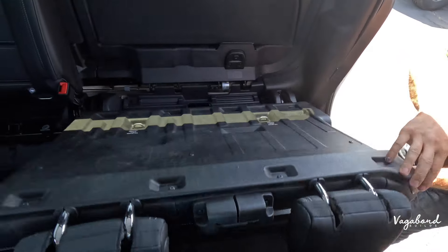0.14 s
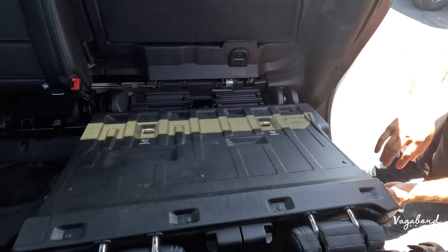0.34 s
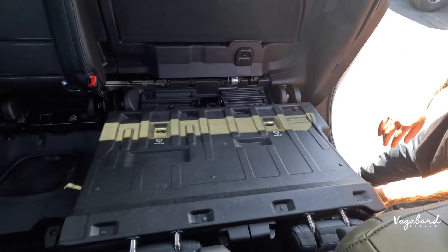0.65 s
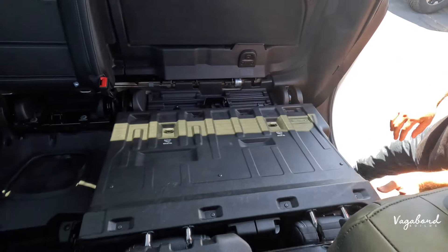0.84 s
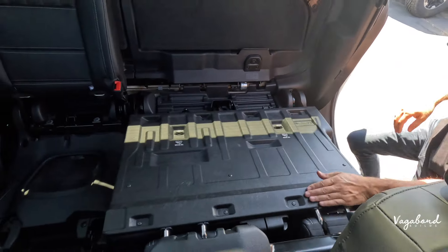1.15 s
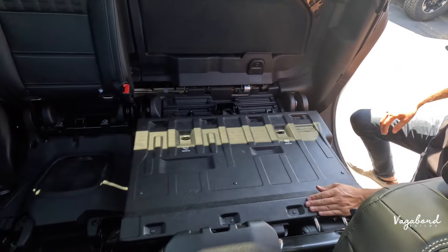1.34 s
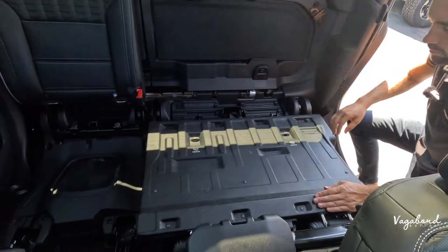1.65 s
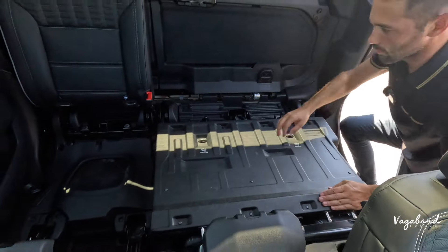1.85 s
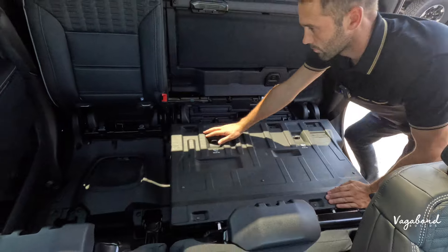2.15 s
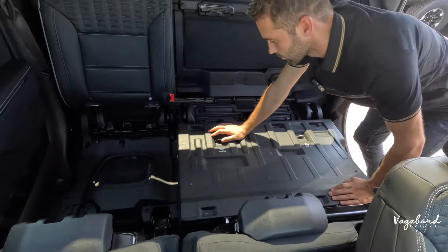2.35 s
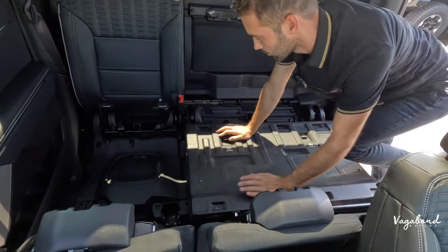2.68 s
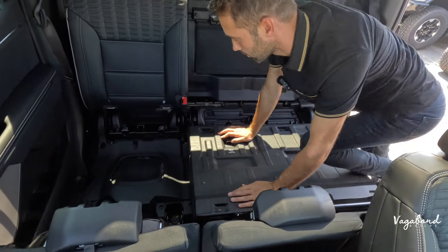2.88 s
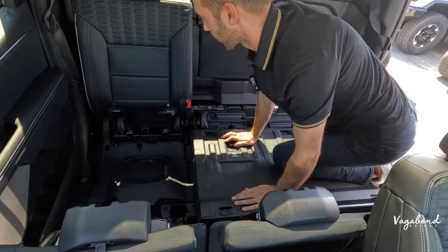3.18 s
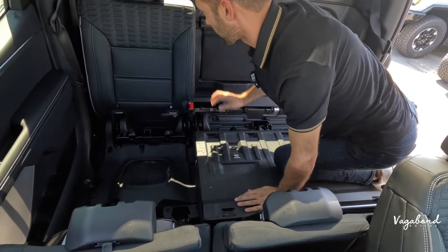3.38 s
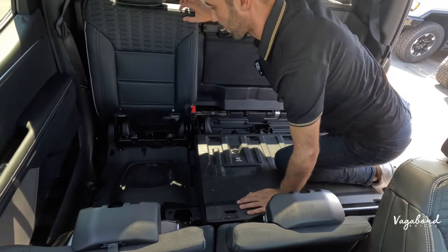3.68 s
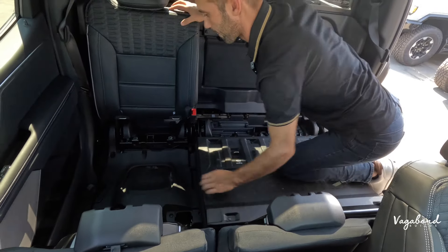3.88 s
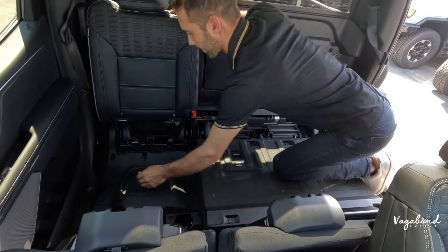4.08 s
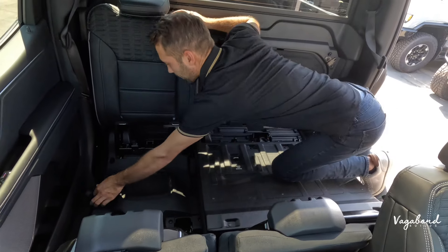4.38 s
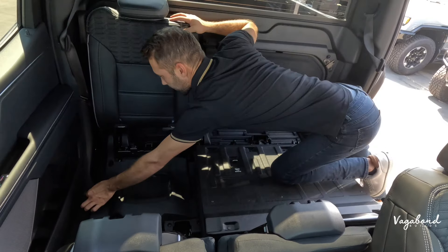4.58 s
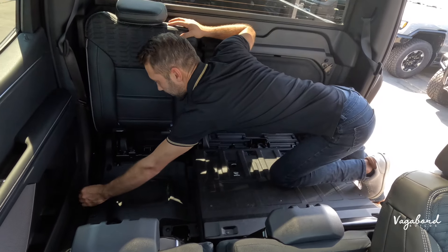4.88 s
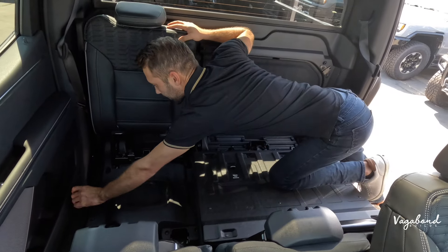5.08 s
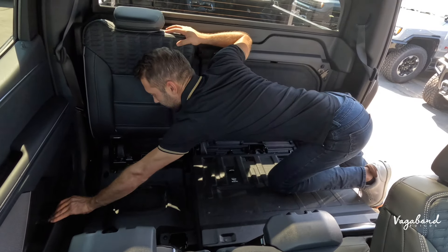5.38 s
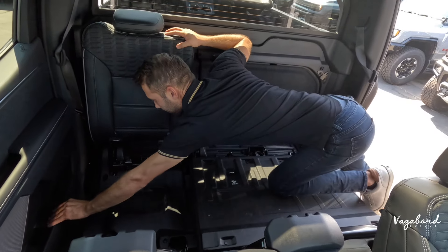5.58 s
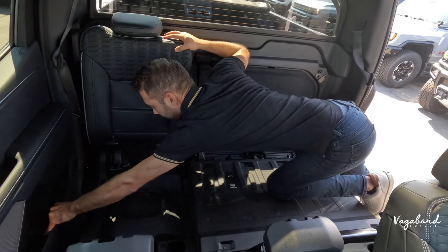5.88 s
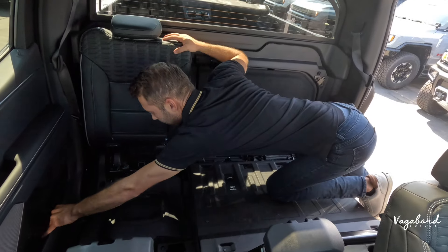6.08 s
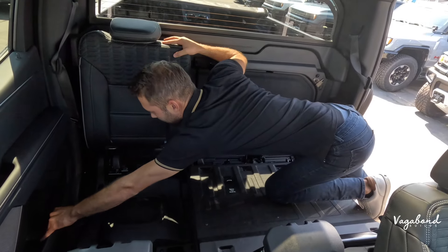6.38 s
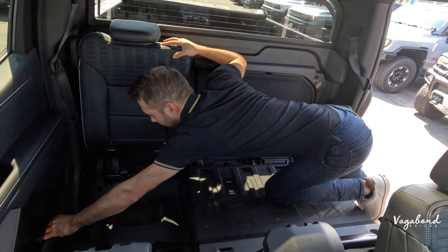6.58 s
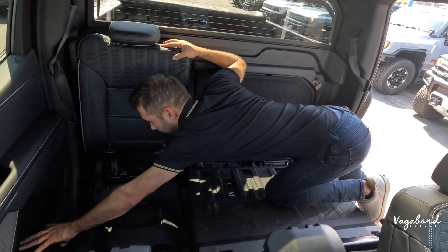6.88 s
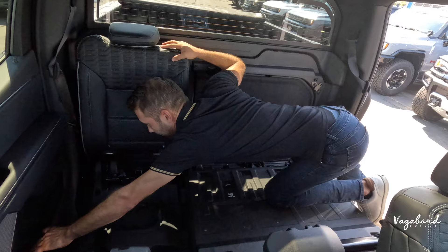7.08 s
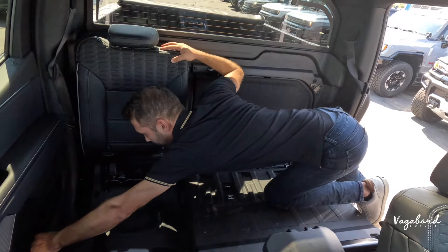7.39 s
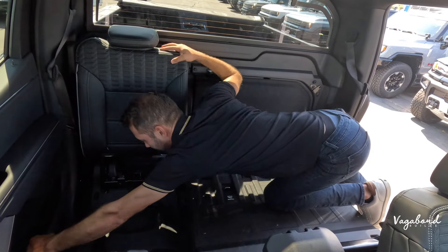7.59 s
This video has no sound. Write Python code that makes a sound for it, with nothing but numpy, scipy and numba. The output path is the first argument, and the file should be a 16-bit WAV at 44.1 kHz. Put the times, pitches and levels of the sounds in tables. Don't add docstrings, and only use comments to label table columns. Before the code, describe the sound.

Close-up handling of a folded rear seat: dull, damped plastic thuds with small latch clicks, gritty fabric rubs and low creaking under shifting weight. Sparse and uneven for the first four seconds, almost still around five, then crowded with knocking, snapping and rattling, peaking in two heavy clunks near seven. Nearly mono, dry small cabin, with a quiet yard and faint machine hum behind.

```python
import sys
import numpy as np
from scipy import signal
from scipy.io import wavfile
from scipy.ndimage import uniform_filter1d
from numba import njit

SR = 44100
rng = np.random.default_rng(int(sys.argv[2]) if len(sys.argv) > 2 else 0)


def nominal_scale(level):
    x = np.asarray(level, float) / 20
    return 10 ** x


def int16_out(signal):
    q = np.round(np.clip(np.atleast_2d(signal).T, -1, 1) * 32767)
    wavfile.write(sys.argv[1], SR, q.astype(np.int16))


N = 341334


def level(x, db):
    return x * nominal_scale(db) / np.sqrt(np.mean(x ** 2))


def crest(x, db):
    return x * nominal_scale(db) / np.max(np.abs(x))


@njit
def svf(x, hz, q):
    y, b, l = np.empty(len(x)), 0., 0.
    for i in range(len(x)):
        g = np.tan(np.pi * hz[i] / SR)
        v = (b + g * (x[i] - l)) / (1 + g * (g + 1 / q))
        b, l, y[i] = 2 * v - b, l + 2 * g * v, v / q
    return y


def band(x, hz, q, order=2):
    hz = np.clip(hz * np.ones(len(x)), 20, .44 * SR)
    for _ in range(order):
        x = svf(x, hz, 1. * q)
    return x


def walk(rate_hz, size=N):
    k = int(SR / rate_hz)
    held = np.repeat(rng.standard_normal(size // k + 1), k)
    return 1.81 * uniform_filter1d(uniform_filter1d(held, k), k)[:size]


def grit(rate_hz, spread_db, size=N):
    k = max(int(SR / rate_hz), 1)
    jump_db = spread_db * np.minimum(rng.exponential(size=size), 3.5)
    return rng.standard_normal(size) * np.repeat(nominal_scale(jump_db), k)[:size]


def swell(t, rise_s, t60_s):
    rise_s, t60_s = np.clip(rise_s, .0004, .04), np.clip(t60_s, .012, .3)
    return np.minimum(t / rise_s, 1) * np.exp(-np.log(1000) * np.maximum(t - rise_s, 0) / t60_s)


def add(out, s, x):
    i = max(int(s * SR), 0)
    out[i:i + len(x)] += x[:N - i]


def yard():
    # (frequency [Hz], density [dB per Hz])
    wash_curve = [(30, 16), (70, -4.5), (200, -14), (400, -11), (800, -5.5), (1200, -33), (3000, -19),
                  (7000, -35.5), (11000, -66.5), (15000, -52)]
    # (centre [Hz], width [Hz], level [dB])
    hum_bands = [(296, 4.7, -62), (780, 9.2, -66.5)]
    hz_at, db_at = np.transpose(wash_curve)
    wash = np.zeros(N)
    for hz in 36 * 2 ** np.arange(0, 8.8, .5):
        db = np.interp(np.log(hz), np.log(hz_at), db_at) + 10 * np.log10(hz) + 1.7 * walk(1.1)
        wash += nominal_scale(db) * level(band(rng.standard_normal(N), hz, 0.98), 0)
    hum = np.zeros(N)
    for hz, width_hz, db in hum_bands:
        hum += level(band(rng.standard_normal(N), hz, hz / width_hz, order=1), db)
    lull_s, lull_width_s, lull_db = 5.1, 0.27, -4
    fade_db = lull_db * np.exp(-((np.arange(N) / SR - lull_s) / lull_width_s) ** 4)
    return (level(wash, -57) + hum) * nominal_scale(fade_db)


def load():
    # (time [s], weight on the panels [dB], movement of the clothes [dB])
    effort = [(0, -62.5, -47.5), (.34, -48.5, -55), (.8, -58.5, -58), (1.08, -55.5, -63.5),
              (1.33, -38, -61), (1.58, -51.5, -67.5), (2.05, -46, -60), (2.7, -61.5, -60.5),
              (2.95, -47, -60), (3.53, -61.5, -66), (3.75, -50, -56), (4.14, -49, -61), (5.3, -66, -85),
              (5.7, -40, -67), (6.05, -54.5, -69), (6.32, -49.5, -68), (6.8, -49, -69), (7.74, -45.5, -58)]
    # (centre [Hz], width [Hz], level [dB])
    resonances = [(114, 86, -2.5), (257, 100, 1), (300, 48, 1.5), (413, 12, 2), (560, 75, -0.5),
                  (793, 94, -1.5)]
    at_s, weight_db, cloth_db = np.transpose(effort)
    t = np.arange(N) / SR
    rumble_db, rustle_db = np.interp(t, at_s, weight_db), np.interp(t, at_s, cloth_db)
    creak_db = rumble_db - 8

    slips = grit(110, 1.6)
    panel = np.zeros(N)
    for k, (hz, width_hz, db) in enumerate(resonances):
        panel += (-1) ** k * nominal_scale(db) * band(slips, hz, hz / width_hz, order=1)
    rumble = level(band(panel, 300., .4), 0) * nominal_scale(rumble_db + 1.8 * walk(25))

    creak = band(grit(300, 2.8), 1500 * 2 ** (0.28 * walk(4.2)), 1.3)
    creak = level(creak, 0) * nominal_scale(creak_db + 0.36 * walk(5.7))

    rustle = np.zeros(N)
    for hz in (3200., 4600., 6500., 9000., 12500.):
        cloth = band(grit(400, 4.), hz, 2.)
        rustle += level(cloth, -10 - 9 * (hz > 1e4)) * nominal_scale(3.5 * walk(22))
    return rumble + creak + rustle * nominal_scale(rustle_db)


def thuds():
    # (time [s], peak [dB])
    pushes = [(2.191, -27), (3.128, -34), (3.31, -54), (4.215, -34), (5.75, -21), (6.879, -21),
              (7.007, -36.5), (7.261, -21), (1.129, -38), (3.758, -34.5), (5.352, -27.5), (5.469, -32.5),
              (5.631, -30.5), (5.84, -43), (6.13, -35), (6.352, -31), (7.572, -46)]
    out, t = np.zeros(N), np.arange(SR // 4) / SR
    for s, db in pushes:
        push = grit(440, 0.83, size=len(t)) * swell(t, rise_s=0.0096, t60_s=0.36)
        add(out, s, crest(band(push, 81.4, 0.67), db))
    return out


def rubs():
    # (time [s], length [s], level [dB], centre [Hz], spread [octaves])
    climbing = [(0, 0.08, -39.5, 7900, 0.28), (0.073, 0.086, -41, 7800, 0.3), (0.16, 0.15, -34, 6160, 0.45),
                (0.339, .11, -35, 5050, 0.36), (0.442, 0.31, -49, 5950, 0.35),
                (0.6, 0.3, -50.5, 6430, 0.48), (0.806, 0.044, -54, 11700, 0.093),
                (1.09, 0.14, -43, 6650, 0.47), (1.212, .17, -46.5, 8500, 0.38), (1.27, 0.14, -35.5, 392, 1),
                (1.462, 0.2, -55, 8100, 0.26), (1.62, 0.19, -37, 394, 0.84), (1.789, .14, -49.5, 6600, 0.3),
                (1.945, 0.14, -45.5, 4050, 0.72), (2.18, 0.071, -33, 3730, 0.84),
                (2.438, 0.15, -26, 6880, 0.51), (2.475, 0.096, -28, 2700, 0.42),
                (2.576, 0.017, -17.5, 5100, 0.87), (2.728, 0.067, -32.5, 6350, 0.82),
                (2.845, 0.072, -36, 6900, 0.5), (2.875, 0.13, -46.5, 2050, 0.6)]
    leaning = [(3.032, 0.075, -47, 2660, 0.32), (3.102, 0.13, -36.5, 3700, 0.6),
               (3.224, 0.15, -54, 5440, 0.3), (3.278, 0.067, -41, 2420, 0.36),
               (3.283, 0.069, -59, 8250, 0.38), (3.548, 0.064, -39.5, 6200, 0.77),
               (3.625, 0.069, -41.5, 6030, 0.42), (3.746, 0.11, -36, 6100, 0.74),
               (3.886, 0.061, -45, 6000, 0.89), (3.951, 0.22, -54, 4520, 0.38),
               (4.018, 0.066, -61, 11960, 0.033), (4.492, 0.1, -56, 4540, 0.55)]
    dragging = [(5.357, 0.14, -53, 4660, 0.37), (5.463, 0.031, -41, 11600, 0.5),
                (5.513, 0.017, -39.5, 8600, 0.64), (5.641, 0.14, -53, 2450, 0.49),
                (5.745, 0.095, -43.5, 4660, 0.81), (6.064, 0.034, -46.5, 2970, 0.63),
                (6.139, 0.062, -45.5, 8400, 0.76), (6.229, .035, -43, 3540, 1.1),
                (6.301, 0.03, -42.5, 2460, 0.87), (6.454, 0.049, -47, 3300, 0.87),
                (6.57, 0.033, -24, 534, 0.18), (6.669, 0.23, -43, 4430, 0.37),
                (6.69, 0.045, -29, 908, 0.22), (6.759, 0.038, -45, 1407, 0.13),
                (6.799, 0.062, -41.5, 1770, 0.61), (6.892, 0.036, -16.5, 1730, 1.065),
                (7.248, 0.052, -37.5, 4000, 0.47), (7.491, 0.073, -48.5, 5700, 0.37),
                (7.617, 0.022, -41.5, 3570, 0.39)]
    brushing = [(1.27, 0.056, -60, 2870, 0.38), (1.3, 0.24, -65, 1420, 0.36),
                (2.86, 0.11, -37.5, 690, 0.93), (3.75, 0.076, -37, 954, 0.62),
                (3.915, 0.061, -44.5, 2270, 0.87), (5.92, 0.12, -63, 3300, 0.54),
                (5.49, 0.087, -50.5, 3300, 0.59), (5.76, 0.12, -51.5, 3730, 0.2),
                (6.13, 0.092, -47, 2620, 0.83), (6.2, 0.08, -56, 4320, 0.3), (4.14, 0.089, -52, 2360, 0.55),
                (6.455, 0.069, -48, 3960, 0.15), (6.465, 0.046, -59, 8100, 0.38),
                (6.94, 0.095, -53.5, 3220, 0.65), (7.06, 0.11, -75, 3180, 0.3),
                (7.19, 0.099, -59, 3750, 0.2), (7.3, 0.039, -52, 3500, 0.84), (7.4, 0.12, -72, 3500, 0.49),
                (7.64, 0.13, -56, 3460, 0.3)]
    kinds = (climbing, -0.091), (leaning, -0.064), (dragging, 0.29), (brushing, -0.029)
    pull_s = 0.071
    out = np.zeros(N)
    strokes = [(*row, glide) for rows, glide in kinds for row in rows]
    for s, length_s, db, hz, spread, glide in strokes:
        u = np.arange(SR // 3) / (SR * np.clip(length_s, .02, .26))
        spread = np.clip(spread, .015, 1.2)
        press = np.minimum(u / 0.27, 1) ** 1.2 * np.exp(-(np.maximum(u - .45, 0) / 0.49) ** 2)
        press_rms = np.sqrt(np.mean(press ** 2))
        glide = glide * min(1, pull_s / length_s)
        centre_hz = hz * 2 ** (glide * (np.minimum(u, 1.2) - .5))
        catches = grit(500, 2.6, size=len(u)) * nominal_scale(2.2 * walk(60, size=len(u)))
        for k in (-2, -1, 0, 1, 2):
            grip = walk(49.8, size=len(u))
            patch_hz = centre_hz * 2 ** (spread * (0.58 * k + 0.11 * grip[::-1]))
            patch = band(catches, patch_hz, 1.374 / spread, order=3)
            patch = patch * nominal_scale(2.06 * grip) * press
            add(out, s, level(patch, db - 3.0 - 1.36 * k * k) * press_rms)
    return out


def taps():
    # (time [s], peak [dB], ring [Hz], t60 [s])
    clips = [(1.243, -39, 1650, 0.027), (1.282, -27, 1580, 0.04), (1.334, -37, 3000, 0.034),
             (1.938, -36.5, 1360, 0.061), (1.999, -32.5, 2690, 0.043), (2.211, -27, 1400, 0.018),
             (2.731, -38, 3860, .03), (2.798, -34, 1300, 0.023), (2.897, -35, 1210, .03),
             (5.398, -39, 4270, .04), (5.43, -34, 4800, .04), (5.433, -31.5, 1220, 0.052),
             (5.472, -16.5, 4400, 0.056), (5.52, -33, 3200, .03), (5.561, -34.5, 4570, 0.036),
             (5.628, -34, 1580, .04), (5.64, -30, 1110, 0.044), (5.635, -38, 4400, 0.08),
             (5.8117, -39, 1540, 0.028), (6.028, -47, 3970, 0.035), (6.074, -35, 1460, .04),
             (6.245, -31.5, 5000, 0.027), (6.308, -32, 2500, 0.063), (6.315, -30.5, 1640, 0.12),
             (6.349, -41, 3300, 0.025), (6.457, -41, 4100, 0.13), (6.478, -34, 2230, 0.048),
             (6.637, -48, 5240, 0.018), (6.726, -38, 1000, 0.038), (6.77, -31, 1420, .04),
             (6.9775, -34, 1330, 0.091), (7.113, -40, 1560, 0.04), (7.3951, -31.5, 2360, 0.019),
             (7.5615, -35, 2650, .03), (7.623, -32, 2150, 0.013), (7.632, -26.5, 3440, 0.044),
             (7.719, -40, 4200, .04)]
    skips = [(3.13, -43, 1800, 0.037), (3.132, -26, 4530, .05), (3.195, -25, 4950, .02),
             (3.759, -45, 1060, 0.032), (6.658, -38, 3360, .04), (6.692, -34, 3370, 0.059),
             (6.7456, -29, 5500, 0.03), (6.801, -29, 6200, 0.027), (6.845, -41, 2400, .03),
             (6.871, -29, 2550, 0.052), (6.912, -8.5, 1490, 0.021), (7.282, -30, 2010, 0.027),
             (7.283, -37, 5070, 0.028)]
    snaps = [(0.168, -20.5, 6900, 0.058), (0.357, -39, 3900, .03), (0.398, -33, 5370, .03),
             (0.542, -24, 7650, .02), (3.194, -40, 13700, 0.045), (3.953, -45, 2900, .025),
             (4.313, -28, 1380, 0.046), (4.315, -31, 2340, 0.033), (6.1, -44, 13420, .05),
             (6.147, -42, 13600, 0.047), (6.161, -38, 13000, .04), (6.174, -37, 12500, 0.063),
             (6.216, -35, 7800, .05), (6.247, -50, 13000, .05), (6.308, -46, 9300, 0.031)]
    out, t = np.zeros(N), np.arange(SR // 8) / SR
    for s, db, hz, t60_s in clips + skips + snaps:
        touch = grit(900, 4.7, size=len(t)) * swell(t, 0.0019, t60_s)
        add(out, s, crest(band(touch, hz, 3, order=3), db))
    return out


def ticks():
    # (time [s], peak near 2 kHz [dB], upper shoulder [dB], top [dB])
    tick_rows = [(1.398, -40, -27, 43), (1.7612, -33, -9, -26), (2.177, -26.5, 9, 6),
                 (3.1603, -10.5, -7, -38), (3.5838, -20.5, -7, 13), (3.6655, -46, 11, 26),
                 (4.3143, -23, 1, -10), (4.392, -45, 9, -14), (4.491, -26, 0, -6), (6.178, -12, -22, -19),
                 (6.2337, -8, -39, -16), (6.25, -20, -21, -18), (6.2935, -27, -7, -3),
                 (6.3463, -14.5, -20, -42), (6.659, -40, 14, 4), (6.6982, -32, 7, 5),
                 (6.7967, -29.5, 6, -13), (7.166, -58, 17, 48), (7.322, -52, -4, 9), (7.38, -57, 12, 16),
                 (7.5073, -19.5, -16, -45), (7.554, -27.5, -2, -3)]
    clack_rows = [(0.1682, -47, 18, 36), (0.268, -39, 9, 35), (0.5408, -49.5, 17.5, 40),
                  (0.9363, -35.5, -5.5, 14), (1.0296, -27, -34, -4), (1.283, -29, -8, 5),
                  (1.6082, -12, -13.5, -8.5), (1.9578, -22, -9.5, 6), (2.3337, -40, 9, -15),
                  (2.583, -42, 24, 9), (3.1267, -6, -9.5, -41), (3.1942, -24, 4.5, 12.5),
                  (3.5482, -46, 1, 45), (3.69, -16, -23, -22), (3.9152, -8, -16, -5),
                  (4.217, -18.5, 2, -67), (4.628, -39, 1.5, -16), (5.469, 2, -13.5, -21),
                  (5.686, -17.5, -10, -9), (5.7452, -15.5, -0.5, -37), (5.9174, -45, 12, 28),
                  (6.1004, -36, 6.5, -7), (6.1221, 1, -13, -60), (7.2694, -49, -23, -24),
                  (7.2784, -22.5, -13.5, 11), (7.5693, -6.5, -39, -31), (7.592, -23, -30, -33)]
    rattle_rows = [
        (1.1198, -11, -13, 16),
        (2.7554, -17, -9, 23),
        (2.8451, -20.5, -3, 14.5),
        (3.7545, -14, -8, -12),
        (5.4273, -25, -7, -19),
        (5.669, -19, 0, -34),
        (6.4616, -13, -22.5, -60),
        (6.7459, -16, -10, -39),
        (7.6226, -25, -22, 25),
    ]
    # (rows, rise [s], t60 [s])
    kinds = (tick_rows, 0.0044, 0.026), (clack_rows, 0.0021, 0.064), (rattle_rows, 0.0023, 0.15)
    top_fall_db = 47.5
    out, t = np.zeros(N), np.arange(SR // 8) / SR
    octave = np.arange(-1, 3, .25)
    for rows, rise_s, t60_s in kinds:
        for s, db, mid_db, top_db in rows:
            snap = grit(830, 0.59, size=len(t)) * swell(t, rise_s, t60_s)
            colour_db = np.interp(octave, [-2, .1, .75, 3.5], [-3, 0, mid_db + 10, top_db + 5.5])
            colour_db = colour_db - top_fall_db * np.maximum(octave - 2.1, 0)
            colour_db = colour_db + 2.8 * rng.standard_normal(len(octave))
            part = np.zeros(len(t))
            for o, ring_db in zip(octave, colour_db):
                ring = band(snap, 2000 * 2 ** o, 4.22, order=3)
                part += nominal_scale(ring_db) * crest(ring, db - 19.5)
            add(out, s - .001, part)
    return out


def knocks():
    # (time [s], peak [dB], main mode [Hz], t60 [s])
    kneeling = [(0.259, -28.5, 176, 0.091), (0.298, -29, 217, 0.16), (0.362, -28.5, 237, 0.19),
                (0.537, -37.5, 183, 0.063), (1.119, -17, 611, 0.05), (1.284, -28, 196, 0.093),
                (1.608, -15.5, 337, 0.056), (1.63, -18, 300, 0.23), (1.76, -32, 730, 0.034),
                (1.96, -27.5, 560, 0.11), (2.005, -29, 212, 0.15), (2.18, -16.5, 231, 0.23),
                (2.52, -19.5, 393, 0.013), (2.759, -20, 320, 0.15), (2.797, -44, 560, 0.049),
                (2.893, -22.5, 300, 0.073), (2.941, -32, 242, 0.09), (3.11, -20.5, 141, 0.056),
                (3.127, -18.5, 437, 0.19), (3.16, -16.5, 202, 0.0099), (3.552, -28.5, 393, 0.051),
                (3.577, -30.5, 410, 0.074), (3.659, -36.5, 670, 0.24), (3.757, -25.5, 300, 0.067),
                (3.903, -17.5, 296, 0.027), (3.922, -16.5, 312, 0.15), (4.218, -24.5, 413, 0.12),
                (4.459, -26.5, 310, 0.11), (4.529, -33, 197, 0.051), (4.63, -39, 330, 0.19)]
    reaching = [(5.172, -41.5, 405, 0.16), (5.35, -27.5, 180, 0.04), (5.47, -16.5, 504, 0.093),
                (5.6267, -22.5, 670, 0.3), (5.663, -16.5, 560, 0.067), (5.683, -10.5, 493, 0.016),
                (5.747, -23.5, 152, 0.052), (5.813, -28.5, 550, 0.088), (5.909, -14.5, 517, 0.093),
                (5.939, -22, 510, 0.084), (5.969, -26, 560, 0.071), (6.082, -20.5, 490, 0.089),
                (6.126, -12, 406, 0.22), (6.179, -18, 368, 0.36), (6.235, -16, 249, 0.12),
                (6.297, -21, 383, 0.34), (6.348, -17.5, 432, 0.066), (6.462, -13, 329, 0.11),
                (6.515, -27.5, 128, 0.025), (6.703, -23, 590, 0.1), (6.87, -17, 580, 0.11),
                (6.895, -8.5, 565, 0.06), (6.903, -4.5, 568, 0.081), (7.013, -25, 246, 0.034),
                (7.063, -25, 656, 0.11), (7.2083, -20, 560, 0.13), (7.2688, -4, 595, 0.023),
                (7.28, -11, 560, 0.03), (7.394, -13, 446, 0.057), (7.569, -18.5, 380, 0.12)]
    trailing = [(1.226, -34, 400, 0.084), (1.298, -23.5, 580, 0.16), (1.335, -36, 490, 0.085),
                (1.402, -31.5, 310, 0.059), (1.685, -26.5, 270, 0.37), (1.135, -25.5, 273, 0.28),
                (1.935, -35.5, 300, 0.11), (2.818, -32, 232, 0.078), (2.847, -29.5, 362, 0.36),
                (2.915, -25.5, 255, 0.21), (2.955, -28, 447, 0.03), (5.372, -34, 203, 0.044),
                (5.405, -38, 220, 0.043), (5.432, -34.5, 504, 0.21), (5.53, -33, 456, 0.11),
                (5.555, -37, 326, 0.11), (5.695, -20.5, 212, 0.13), (5.843, -31, 500, 0.033),
                (5.99, -43, 500, 0.13), (6.222, -18, 415, 0.045), (6.322, -30.5, 590, 0.082),
                (6.362, -22, 300, 0.16), (6.592, -36, 530, 0.17), (6.945, -43, 560, 0.055),
                (7.3, -26, 300, 0.13), (7.415, -27.5, 250, 0.084), (7.51, -40, 450, 0.042),
                (7.6, -27.5, 270, 0.12), (7.725, -34, 251, 0.084), (3.95, -32, 300, 0.4),
                (5.345, -39, 540, .04), (1.03, -44.5, 480, 0.056)]
    # (ratio to main mode, level [dB])
    overtones = [(.55, -24), (0.781, -11.5), (1, 1.5), (1.279, -6.5), (1.7, -8.5), (2.398, -25.5)]
    out, t = np.zeros(N), np.arange(SR // 4) / SR
    ratio, over_db = np.transpose(overtones)
    for s, db, hz, t60_s in kneeling + reaching + trailing:
        detune, uneven = rng.standard_normal((2, len(ratio)))
        rise_s = 0.00086 + 0.0087 * hz / 1e3
        contact = grit(390, 2.68, size=len(t)) * swell(t, rise_s, t60_s)
        contact[SR // 1000] += 6.5
        mode_hz = (hz * ratio * (1 + 0.07 * detune * (ratio != 1)))[:, None]
        modes = np.sin(2 * np.pi * mode_hz * t) * np.exp(-t * mode_hz / 1.6)
        response = nominal_scale(over_db + 0.37 * uneven) @ modes
        body = signal.fftconvolve(contact, response)[:len(t)]
        body = band(body, 1.072 * hz, 0.42)
        add(out, s - .001, crest(body, db + 3.5))
    return out


def cab(x):
    t60_s, gap_s = 0.16, .003
    t = np.arange(SR // 4) / SR
    tail = band(rng.standard_normal(len(t)), 520.0, 0.017, order=1)
    tail = tail * np.exp(-np.log(1000) * t / t60_s) * (t > gap_s)
    return signal.fftconvolve(x, tail / np.sqrt(np.sum(tail ** 2)))[:N]


def scene():
    near = load() + thuds() + rubs() + taps() + ticks() + knocks()
    mid = near + nominal_scale(-15.5) * cab(near) + yard()
    side_top = band(np.roll(near, 40), 13000., 1.2)
    side = nominal_scale(-51 + 10 * walk(30)) * (1.2 * cab(near) + 19 * side_top)
    return np.array([mid + side, mid - side])


def band_limit(x):
    return signal.sosfilt(signal.butter(12, 16460, fs=SR, output="sos"), x)


def record(dry):
    low_hz, top_hz, hiss_db = 74, 17000, -88
    x = signal.sosfilt(signal.butter(4, low_hz, "highpass", fs=SR, output="sos"), dry)
    x = signal.sosfilt(signal.cheby2(12, 60, top_hz, fs=SR, output="sos"), x)
    x = x + nominal_scale(hiss_db) * rng.standard_normal(x.shape)
    x = 1.1 * np.tanh(.74 * x)
    return band_limit(x)


dry = scene()
out = record(dry)
int16_out(out)
```